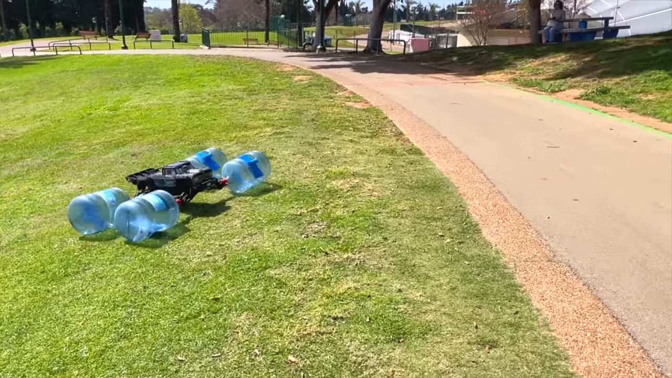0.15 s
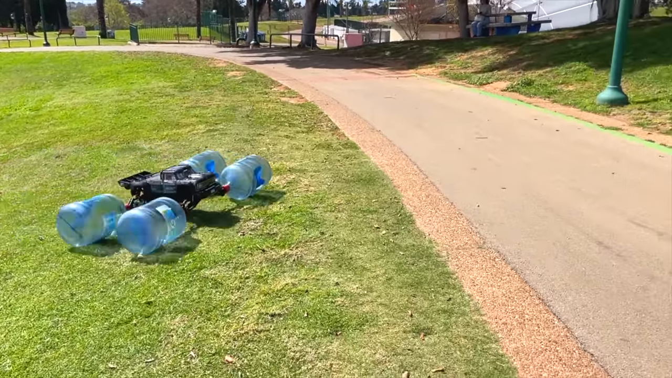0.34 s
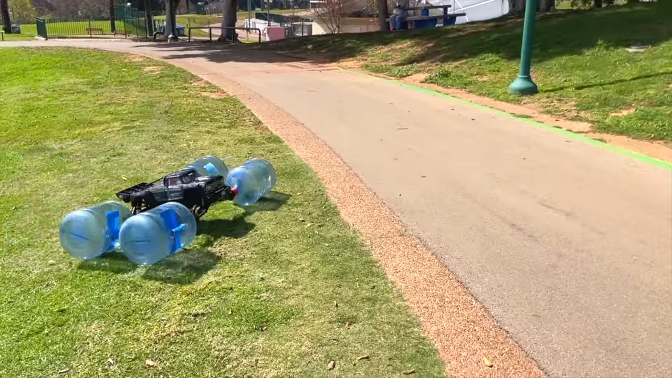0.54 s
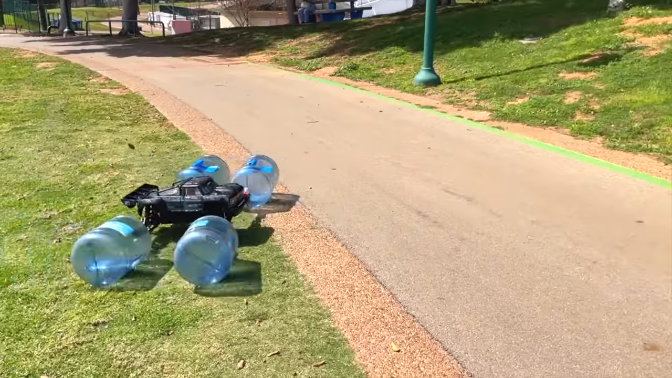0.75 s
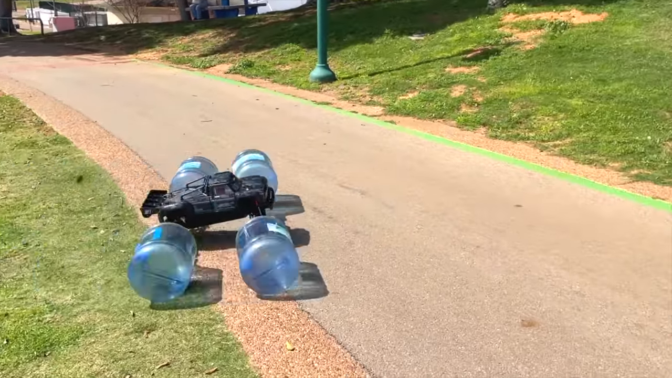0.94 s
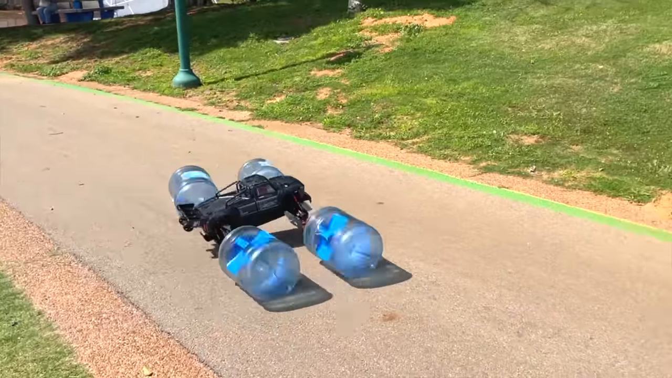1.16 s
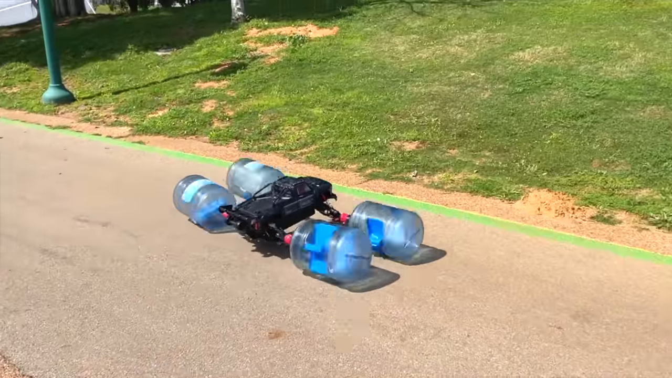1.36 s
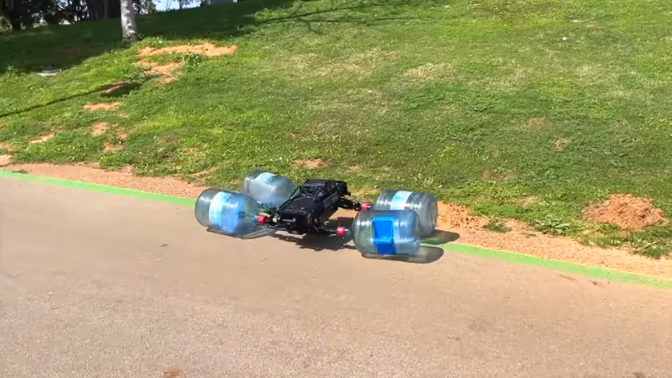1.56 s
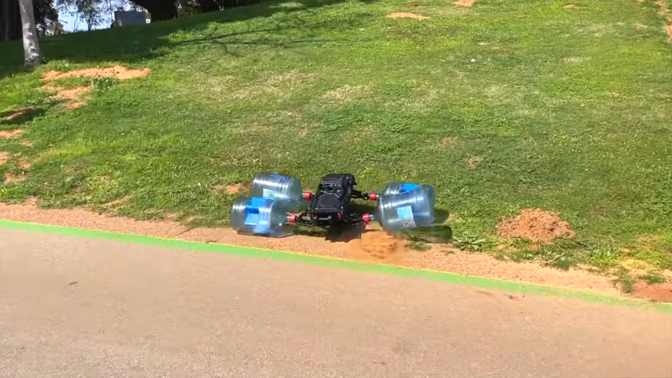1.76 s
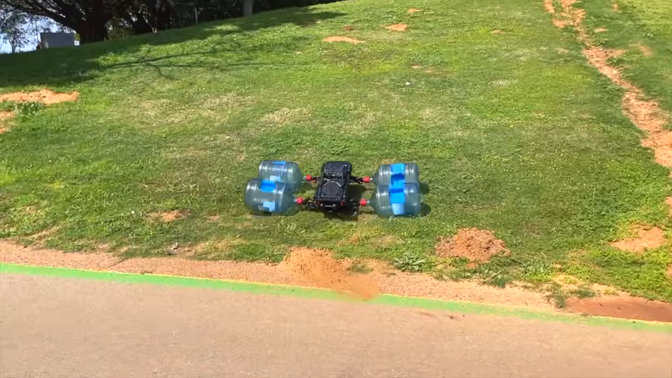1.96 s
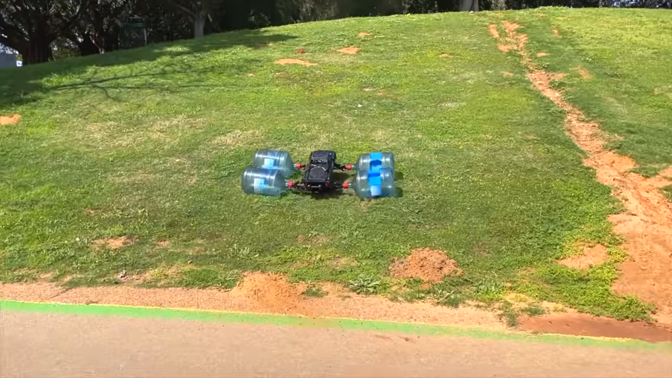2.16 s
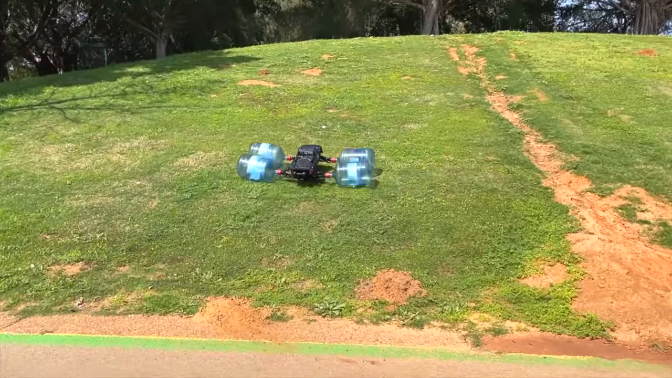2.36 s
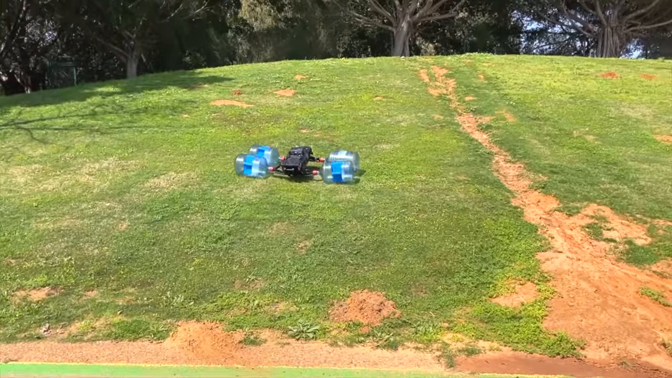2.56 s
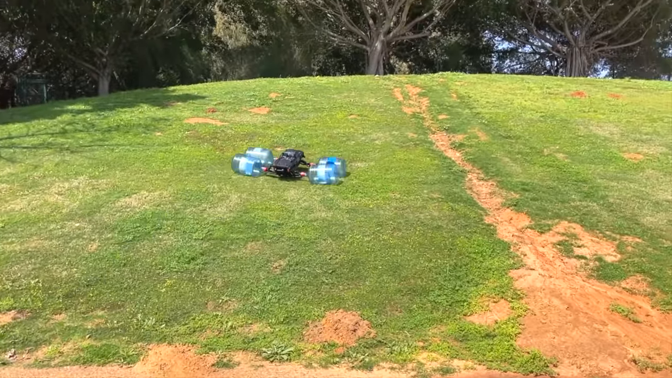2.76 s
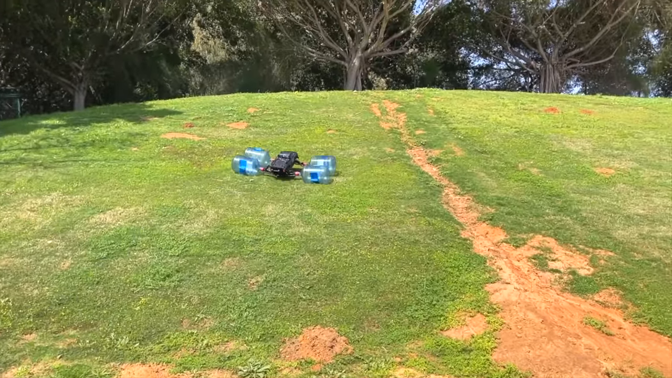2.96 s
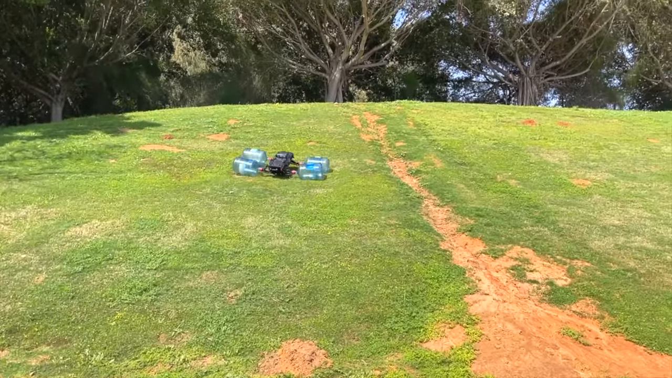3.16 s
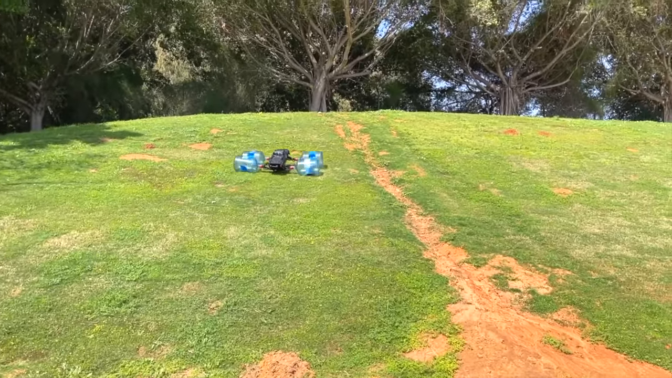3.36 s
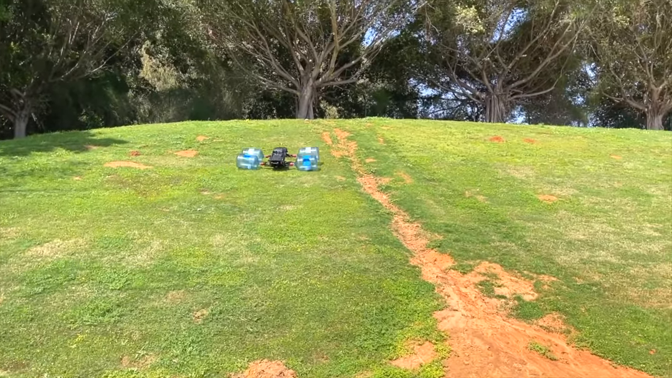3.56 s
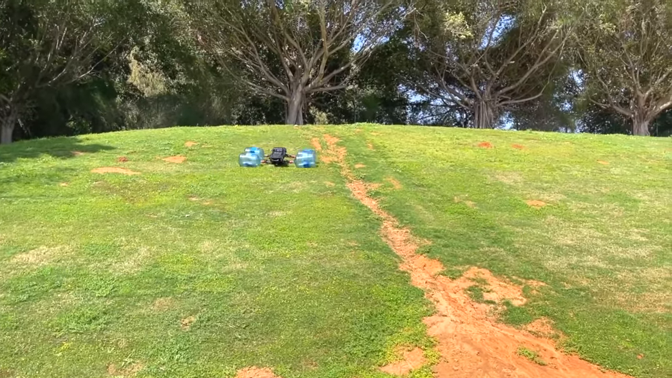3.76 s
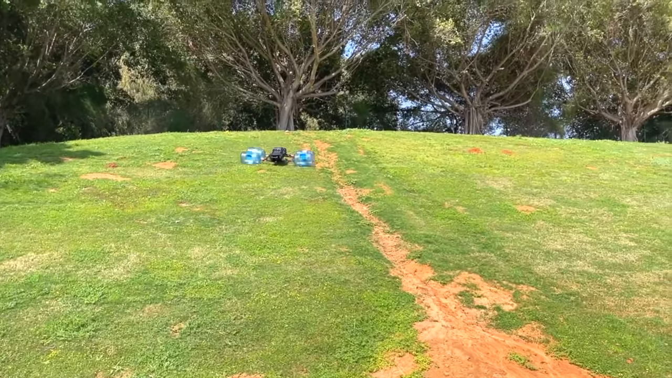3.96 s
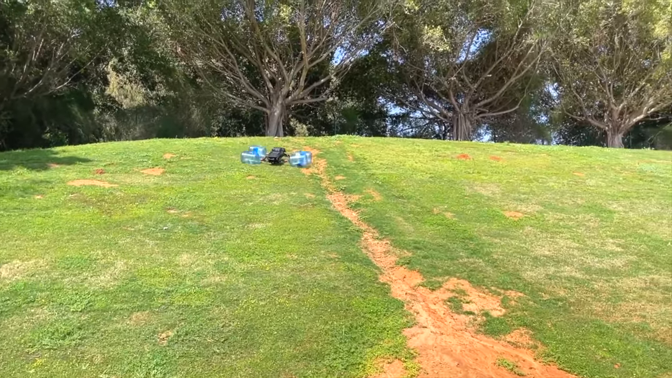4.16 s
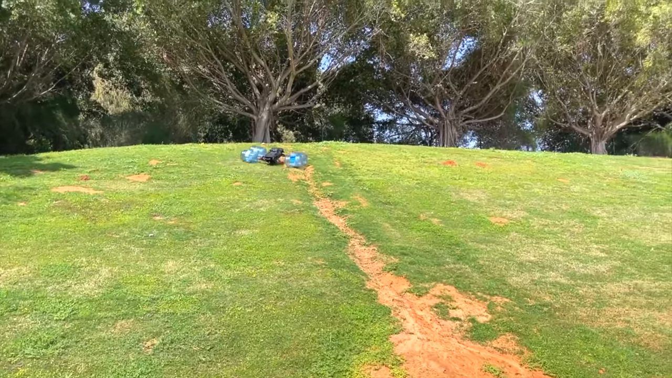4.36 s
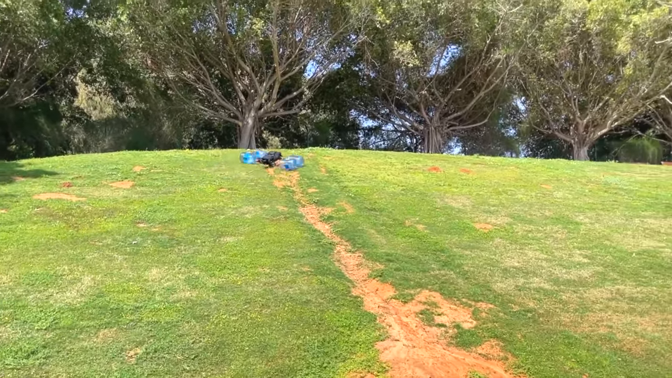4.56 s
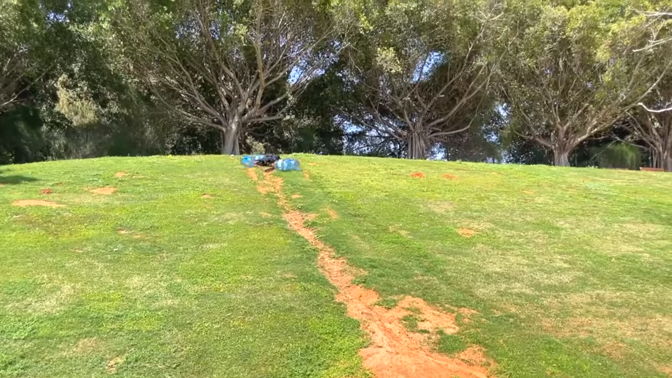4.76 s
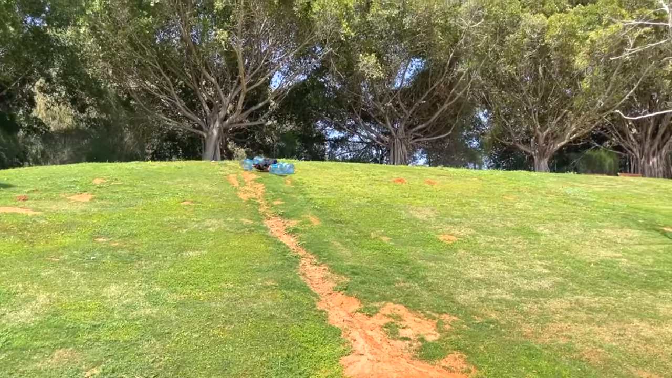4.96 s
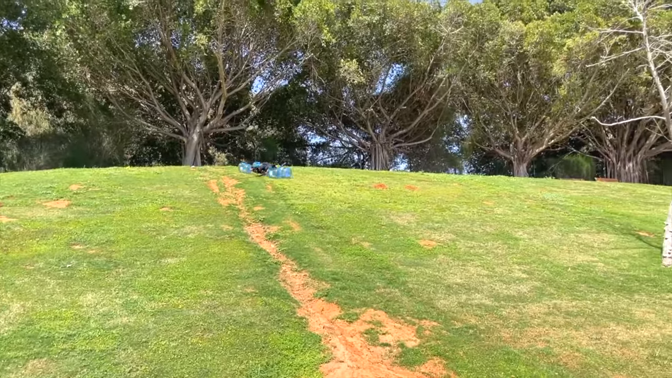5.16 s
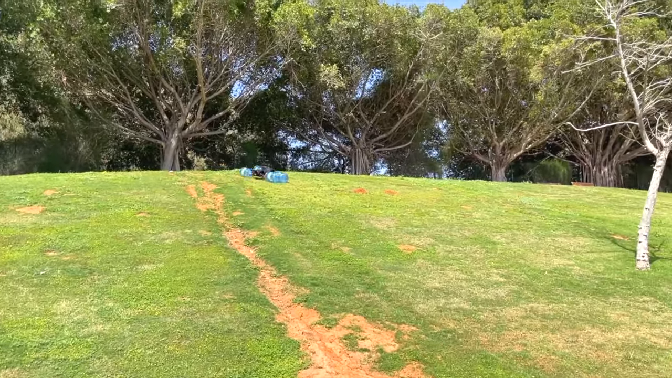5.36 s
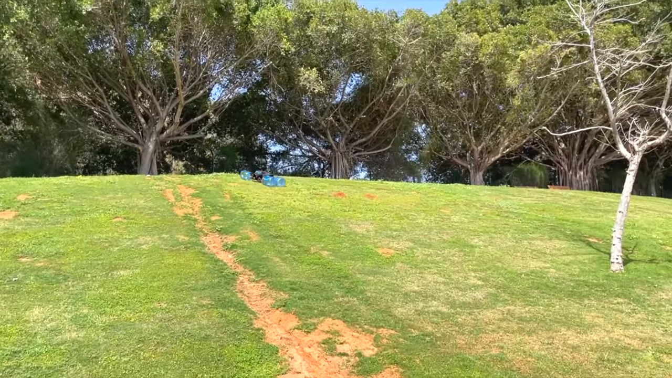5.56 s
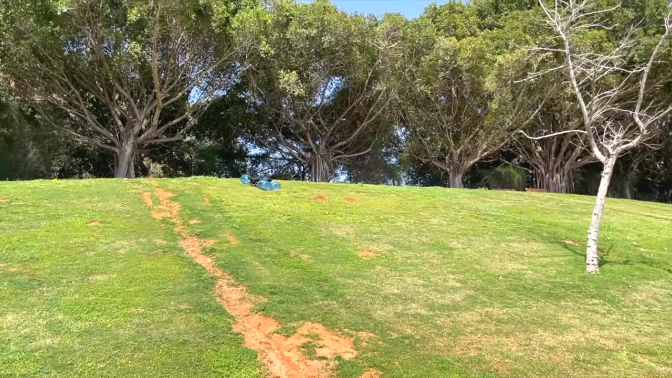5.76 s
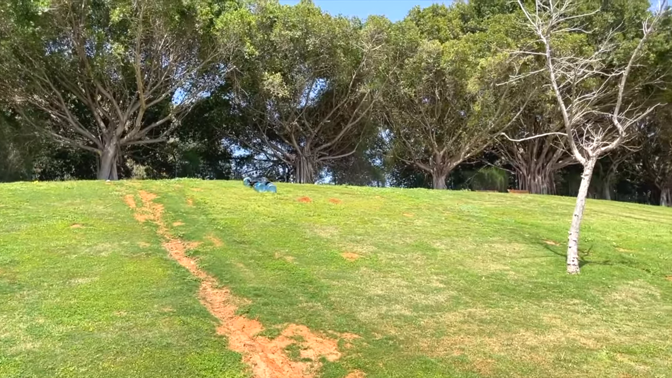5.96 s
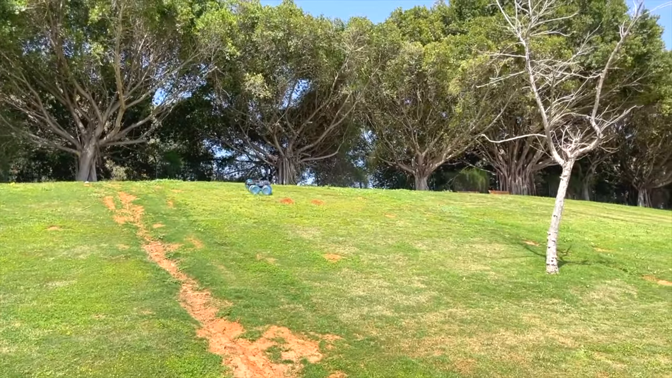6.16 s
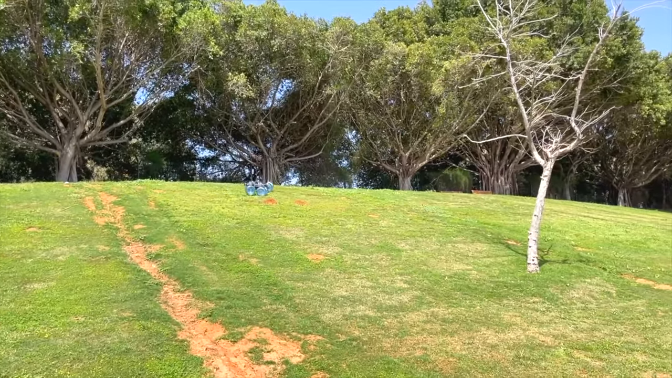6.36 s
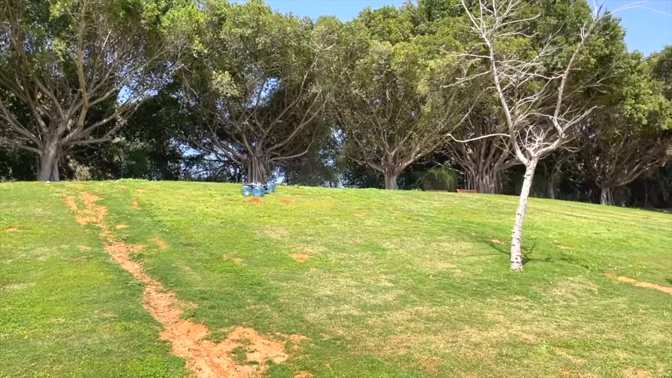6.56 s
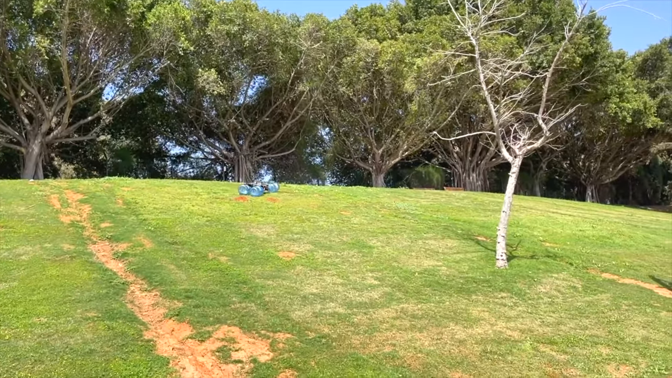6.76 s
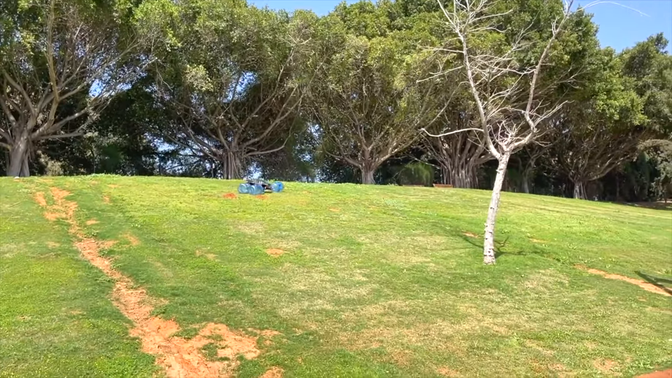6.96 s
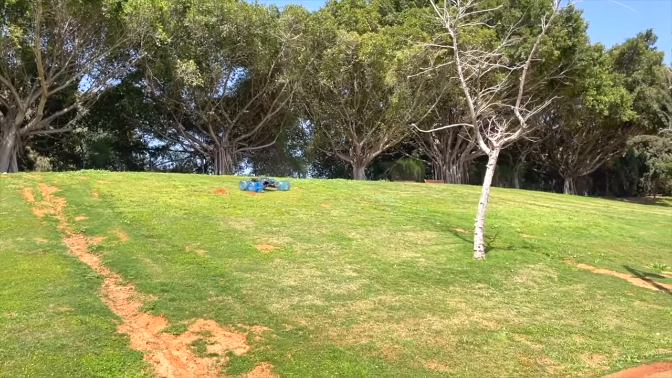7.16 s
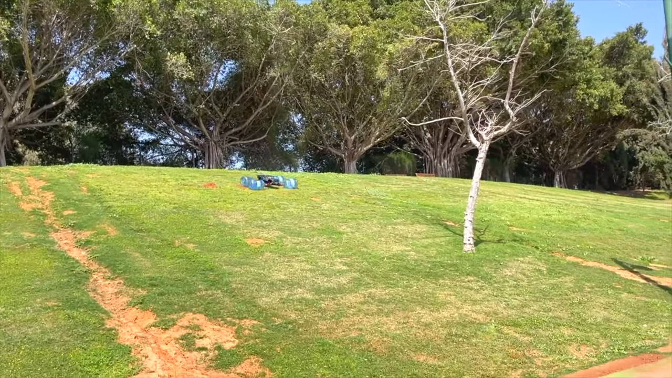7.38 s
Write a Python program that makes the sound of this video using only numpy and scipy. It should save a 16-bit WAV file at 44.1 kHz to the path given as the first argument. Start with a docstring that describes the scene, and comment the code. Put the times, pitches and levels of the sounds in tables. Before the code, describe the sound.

A handheld stereo microphone in an open park hears a whirring electric car rolling on hollow water jugs. Soft drumming and grassy scraping swell into a loud, dense clatter of slaps, knocks and resonant thuds on a paved path. The car then climbs the lawn, farther and duller, with irregular bumps and low grumbling, before sinking behind the hill. Light breeze, faint bird-like whistles and slight late gear whine remain.

```python
"""Four empty plastic water jugs, the wheels of a small electric car, drum, scrape, knock and slap: resonators and
coloured spectra struck by random grains. The car speeds over a lawn, crosses a paved path close by, climbs
a grassy hill, drops behind the crest and partly comes up again. Its gears whine (wavering sines) and rasp
(modulated noise); the park adds distant wash, far whistled notes and a light breeze on two microphone ports."""
import sys
import numpy as np
from scipy import signal
from scipy.fft import rfft, irfft
from scipy.io import wavfile

SR = 44100
rng = np.random.default_rng(int(sys.argv[2]) if len(sys.argv) > 2 else 0)


def output_pcm(signal):
    """Save a mono or channel-first signal as 16-bit PCM at the path in sys.argv[1].

    Samples are clipped to [-1, 1] before scaling.
    """
    pcm = np.clip(np.atleast_2d(signal).T, -1, 1) * 32767
    wavfile.write(sys.argv[1], SR, np.round(pcm).astype(np.int16))


N = 327222
TIME_S, FREQS_HZ = np.arange(N) / SR, np.fft.rfftfreq(N, 1 / SR)

# Levels in all tables are relative, before trims and normalisation.
# jugs rolling: t/s, drumming level/dB, scraping level/dB
ROLLING = [(0, -41.5, -39.5), (0.25, -39, -39.5), (0.45, -32, -35), (0.72, -24.5, -28.5),
           (0.92, -26, -27.5), (1.1, -24, -30), (1.68, -24.5, -30.5), (1.82, -31, -41), (2.0, -40, -47),
           (2.3, -45.5, -49.5), (2.55, -39, -48), (3.0, -45, -51), (3.7, -40.5, -52.5), (4.05, -45.5, -52),
           (4.5, -36.5, -49.5), (5.22, -37.5, -49), (5.55, -47, -48), (7.42, -46.5, -47.5)]
# reference pitch of the gears: t/s, f/Hz
GEAR_PITCH = [(0, 1000), (0.06, 1190), (0.18, 1295), (0.27, 1287), (0.37, 1430), (0.5, 1560), (0.8, 1604),
              (2.1, 1414), (2.9, 1405), (5.2, 1379), (5.6, 1235), (7.05, 1225), (7.14, 1396)]
# resonances of the jug walls: f/Hz, width/Hz, level/dB
WALL_MODES = [(345, 60, -9), (400, 49, -10.5), (507.6, 170, -4), (624, 90, 0.5), (749, 62, 1.5),
              (987.6, 55, -3), (1175, 170, -2.5)]
# high resonances of the thin plastic: f/Hz, width/Hz, level/dB
SHELL_MODES = [(1420, 250, -3), (1770, 90, -2), (2670, 65, 2), (3247, 32, -0.5), (5360, 65, 3),
               (6002, 64, 6.5), (6400, 200, 3), (7400, 70, -0.5)]
# hard landings of a jug: t/s, crack level/dB, snap level/dB, tick level/dB,
# boom lag/s, boom level/dB, boom f/Hz, wall clatter level/dB
LANDINGS = [(0.728, -4.5, -30, -41, 0.0016, -9.5, 243, -16),
            (0.7495, -7.5, -18, -19, 0.0041, -12, 208, -21.5),
            (0.9623, -4.5, -14, -29, 0.0074, -12.5, 281, -22),
            (1.118, -7.5, -13.5, -12, 0.014, -3.5, 305.4, -17),
            (1.2569, -8, -22, -15.5, 0.0089, -3, 291.3, -9.5),
            (1.397, -7.5, -14, -13, 0.014, -6.5, 268.4, -16), (1.5428, -1, -17, -11.5, 0.02, -12, 269, -23),
            (1.625, -13.5, -24, -24, 0.02, -10.5, 287.2, -41),
            (2.376, -33, -61, -65, 0.01, -18.5, 149, -50),
            (3.5674, -37.5, -46.5, -60, 0.0112, -20.5, 180, -43),
            (4.164, -33.5, -49, -30, 0.014, -15, 179, -38), (4.462, -35, -65, -65, 0.0088, -18.5, 166, -38),
            (4.557, -34, -47.5, -58, 0.0085, -27, 139, -38),
            (5.008, -25.5, -50, -38, 0.0089, -18, 162, -31)]
CRACK_HALF_S = 0.012  # the hold of a crack is down by half here, before its rise is counted


def amp(db):
    """Decibels to gain."""
    return 10 ** (np.asarray(db) / 20)


def unit(x):
    """Scales to rms 1."""
    return x / np.sqrt(np.mean(x ** 2) + 1e-20)


def curves(rows):
    """Each column of a time table, sample by sample."""
    t_s, *columns = np.transpose(rows)
    return [np.interp(TIME_S, t_s, c) for c in columns]


def spectra(rows):
    """Each column of a frequency table, bin by bin on a log axis."""
    hz, *columns = np.transpose(rows)
    return [np.interp(np.log(FREQS_HZ + 1), np.log(hz), c) for c in columns]


def colour(x, points):
    """Filters by a spectrum, keeping the power of white noise."""
    gain = unit(amp(spectra(points)[0]))
    return irfft(rfft(x) * gain, N)


def ring(x, modes):
    """Passes x through dying resonances, keeping the power of white noise."""
    t = TIME_S[:SR // 6]
    body = np.zeros(len(t))
    for k, (hz, width_hz, db) in enumerate(modes):
        decay = np.sqrt(width_hz) * np.exp(-np.pi * width_hz * t)
        body += (-1) ** k * amp(db) * decay * np.sin(2 * np.pi * hz * t)
    return signal.oaconvolve(x, body / np.linalg.norm(body))[:N]


def wander(rate_hz, step=32):
    """Random drift of rms 1, low-passed near rate_hz."""
    coarse_s = TIME_S[::step]
    hz = np.fft.rfftfreq(len(coarse_s), step / SR)
    noise = rfft(rng.standard_normal(len(coarse_s)))
    slow = irfft(noise / (1 + (hz / rate_hz) ** 4), len(coarse_s))
    return unit(np.interp(TIME_S, coarse_s, slow))


def grains(per_s, spread_db):
    """Random tiny impacts of uneven size, rms 1."""
    size = amp(spread_db * np.minimum(rng.exponential(1, N), 4))
    sign = rng.choice([-1, 1], N)
    return unit(size * sign * (rng.random(N) < per_s / SR))


def add(mix, t_s, sound):
    """Mixes a sound in at t_s, or at 0 if that is negative."""
    part = mix[max(round(t_s * SR), 0):][:len(sound)]
    part += sound[:len(part)]


def burst(t, half_s, rise_s):
    """Quick rise, a short hold, then a fall around half_s."""
    return (1 - np.exp(-t / rise_s)) / (1 + (t / half_s) ** 3)


def window(start_s, rise_s, end_s, fall_s):
    """Rises from 0 to 1, holds, and falls back from end_s."""
    return np.clip((TIME_S - start_s) / rise_s, 0, 1) * np.clip(1 - (TIME_S - end_s) / fall_s, 0, 1)


def glides(rows, waver_hz):
    """Notes that swell and fade while their pitch slides, off course by waver_hz."""
    out = np.zeros(N)
    for t_s, length_s, first_hz, last_hz, db in rows:
        u = np.linspace(0, 1, round(length_s * SR))
        hz = first_hz + (last_hz - first_hz) * u + np.interp(t_s + u * length_s, TIME_S, waver_hz)
        tone = unit(np.sin(2 * np.pi * np.cumsum(hz) / SR))
        add(out, t_s, amp(db) * np.sin(np.pi * u) * tone)
    return out


def hardness():
    """Hardness of the ground under the jugs: lawn 0, pavement 0.84."""
    # paved path: first jug on t/s, time to get on/s, first jug off t/s, time to get off/s
    path = (0.5, 0.67, 1.67, 0.53)
    return 0.84 * window(*path)


def hidden():
    """How far the car has sunk behind the crest, 0-1."""
    # crest: sinks t/s, time to sink/s, comes up t/s, time to come up/s
    crest = (5.224, 0.48, 5.94, 2.94)
    return window(*crest)


def scraping_db():
    """Scraping level, lowered by the hill's shadow."""
    return curves(ROLLING)[1] - 20 * hidden()


def load():
    """Throttle pushes load the gears: gains of the rasp and of the whining overtones."""
    # throttle: start t/s, length/s, rasp level/dB, overtone level/dB
    pushes = [(-0.1, 0.27, -47.5, -47), (0.13, 0.45, -58, -37.5), (0.587, 1.23, -42, -43.5),
              (1.887, 0.68, -60, -56.5), (2.541, 0.37, -56.5, -59), (2.999, 1.34, -59.5, -65),
              (5.056, 0.15, -49.5, -66), (5.25, 0.11, -51, -68), (7.048, 0.35, -65, -80.5)]
    rise_s, fall_s = 0.065, 0.058
    return sum(amp(db)[:, None] * window(t_s, rise_s, t_s + length_s, fall_s)
               for t_s, length_s, *db in pushes)


def park(air_db=-53, calm_db=-50, wind_db=3.0, buffet_db=3.0, apart=0.31):
    """Coloured noise makes distant wash and gusts on the ports; gliding sines whistle far off."""
    # distant wash: f/Hz, level/dB
    air_spectrum = [(30, -9.5), (100, -11.5), (200, -14), (400, -20), (800, -20.5), (1150, -21.5),
                    (1900, -27), (3000, -34), (4300, -43.5), (7000, -43), (12500, -72.5), (14300, -56.5),
                    (15200, -81.5)]
    # breeze: f/Hz, level/dB
    wind_spectrum = [(20, -36), (40, -11.5), (65, -4.5), (90, -8), (130, -11), (220, -34), (500, -78)]
    # gusts: peak t/s, gaussian width/s, level/dB
    breeze = [(0.0, 0.026, -37), (0.77, 0.29, -34), (1.42, 0.031, -41), (1.7, 0.27, -45),
              (2.48, 0.073, -38), (2.9, 0.34, -46.5), (5.499, 0.18, -55), (6.419, 0.16, -43.5),
              (7.11, 0.06, -41), (7.4, 0.12, -43.5)]
    # whistled notes: start t/s, length/s, first f/Hz, last f/Hz, level/dB
    whistles = [(5.64, 0.1, 3210, 3160, -72), (5.76, 0.08, 3160, 3130, -72),
                (5.84, 0.08, 3170, 3170, -69.5), (6.4, 0.22, 3090, 3060, -71),
                (6.58, 0.21, 3060, 2865, -73)]
    air = colour(rng.standard_normal((2, N)) + 0.14 * rng.standard_normal(N), air_spectrum)
    wind = colour(rng.standard_normal(N) + apart * rng.standard_normal((2, N)), wind_spectrum)
    gust_power = sum((amp(db) * np.exp(-.5 * ((TIME_S - t_s) / width_s) ** 2)) ** 2
                     for t_s, width_s, db in breeze)
    strength = np.sqrt(amp(calm_db) ** 2 + gust_power)
    wind = unit(wind) * strength * amp(wind_db + buffet_db * np.tanh(wander(20)))
    return amp(air_db) * unit(air) + wind + glides(whistles, 18 * wander(70))


def revs(blur_hz=450):
    """The revving motor's high whine sweeps up, pitch and level smeared almost into hiss."""
    # sweeps: start t/s, length/s, first f/Hz, last f/Hz, level/dB
    sweeps = [(0.5, 0.34, 11100, 14800, -37.5), (1.98, 0.41, 10700, 14340, -64)]
    return glides(sweeps, blur_hz * wander(420)) * wander(305.6)


def rasp(rasp_db=-1, judder_db=0.5, core_hz=260, skirt_hz=750, skirt=0.69, waver=0.064):
    """Loaded gears chatter: an uneven band around twice the reference pitch, with wide skirts."""
    pitch_hz = 2 * curves(GEAR_PITCH)[0] * (1 + waver * wander(14))
    angle = 2 * np.pi * np.cumsum(pitch_hz) / SR

    def baseband(lowpass):
        return unit(irfft(rfft(grains(2600, 1.4) * np.cos(angle)) * lowpass, N))

    core = baseband(1 / np.sqrt(1 + (FREQS_HZ / core_hz) ** 4))
    wide = baseband(1 / np.sqrt(1 + (FREQS_HZ / skirt_hz) ** 6))
    chatter = core * np.cos(angle) + skirt * wide * np.sin(angle)
    return unit(chatter) * load()[0] * amp(rasp_db + judder_db * np.tanh(wander(27)))


def gears(waver=0.014, tone_rough=0.027, overtone_rough=0.021, flutter_db=3, chatter=0.59,
          tone_db=-16, coast_db=-65, overtone_db=-1):
    """Meshing teeth whine: one tone with the scraping and coasting, more strands under load; all shake."""
    # loaded whines: multiple of the reference pitch, level/dB
    strands = [(0.8, -8), (1.72, -11), (2, -1), (2.6, -27.5), (3, -9), (4, -20), (6, -20), (8, -8.5)]
    # coasting, gears unloaded: start t/s, rise/s, end t/s, fall/s
    coast = (6.1, 0.35, 6.9, 0.16)
    pitch_hz = curves(GEAR_PITCH)[0]

    def strand(multiple, rough):
        hz = multiple * pitch_hz * (1 + waver * wander(16) + rough * wander(311))
        flutter = amp(flutter_db * np.tanh(wander(25)))
        return unit(np.sin(2 * np.pi * np.cumsum(hz) / SR) * flutter * (1 + chatter * wander(90)))

    overtones = unit(sum(amp(db) * strand(multiple, overtone_rough) for multiple, db in strands))
    tone_gain = amp(scraping_db() + tone_db) + amp(coast_db) * window(*coast)
    return tone_gain * strand(0.9, tone_rough) + amp(overtone_db) * load()[1] * overtones


def shell(x, ringing=0.054):
    """A sharp blow is heard directly and through the short ring of the thin plastic."""
    return x + ringing * ring(x, SHELL_MODES)


def hollow(x, ringing):
    """What shakes a jug is heard directly and through the lasting ring of the air inside."""
    # air resonances: f/Hz, width/Hz, level/dB
    cavity_modes = [(649, 27, -5), (779, 22, -3), (800, 8.8, -2), (1114, 16, -0.5), (1430, 40, -8.5),
                    (1817, 24, 5), (2180, 50, -9.5), (2690, 60, -9)]
    return x + ringing * ring(x, cavity_modes)


def verge(db=-51, clump_db=3):
    """Dry stalks and dirt beside the path snap in clumps as the jugs leave it."""
    # verge: start t/s, rise/s, end t/s, fall/s
    verge_window = (1.6, 0.098, 1.72, 1.05)
    # stalks: f/Hz, level/dB
    stalk_spectrum = [(1300, 0), (1750, 18), (2500, -24), (3400, 1), (3900, 19), (4700, -15), (6500, -33),
                      (9000, -30.5)]
    snaps = colour(grains(500, 3.2), stalk_spectrum)
    return amp(db + clump_db * wander(30)) * window(*verge_window) * snaps


def scuffs(db=-46, lurch_db=2.5):
    """Rough ground high on the hill keeps the jug walls grumbling: dense low-coloured grains."""
    # rough ground: start t/s, rise/s, end t/s, fall/s
    rough_ground = (2.92, 1.72, 5.3, 0.06)
    # scuffed walls: f/Hz, level/dB
    scuff_spectrum = [(190, -8), (285, -0.5), (400, -11), (520, -4.5), (630, 6), (820, -12), (1030, -1.5),
                      (1300, -27), (2500, -42.5)]
    grumble = colour(grains(1400, 1.0), scuff_spectrum)
    return amp(db + lurch_db * wander(15)) * window(*rough_ground) * grumble


def ticks(tick_db=0.0, half_s=0.0051):
    """A crease flips in the thin wall: almost all of it is high treble."""
    # flips: f/Hz, level/dB
    tick_spectrum = [(5000, -22.5), (9000, -4.5), (12000, -3.5), (14500, -1), (16000, -23.5)]
    t, flips = TIME_S[:SR // 16], np.zeros(N)
    for t_s, _, _, db, *_ in LANDINGS:
        add(flips, t_s, amp(db + tick_db) * burst(t, half_s, 0.0024))
    return colour(flips * grains(13000, 1.0), tick_spectrum)


def knocks(knock_db=0.0, detune=0.015, reach_octaves=0.45, decay_s=0.008):
    """A stone or clod sets the wall's modes ringing together; each spot is tuned a little differently."""
    # knocks: t/s, level/dB, strongest f/Hz
    blows = [(0.73, -8.5, 760), (1.259, -10, 1010), (1.415, -7, 690), (1.548, -13, 1100), (1.705, -20, 696),
             (1.815, -16.5, 650), (2.38, -36, 950), (2.487, -33, 380), (2.642, -30.5, 380),
             (3.486, -37, 647), (3.864, -31.5, 1060), (3.92, -25.5, 654), (4.042, -36, 600),
             (4.434, -26, 517), (4.474, -28, 650), (4.555, -32, 850), (4.58, -30.5, 910), (4.694, -34, 860),
             (4.78, -28, 615), (4.81, -28, 568), (5.009, -29.5, 1000), (5.021, -22, 298),
             (5.036, -27.5, 450)]
    t, out = TIME_S[:SR // 12], np.zeros(N)
    hz, _, db = np.transpose(WALL_MODES + SHELL_MODES)[:, :, None]
    for t_s, level_db, strongest_hz in blows:
        weight = amp(db) * np.exp(-.5 * (np.log2(hz / strongest_hz) / reach_octaves) ** 2)
        tuning, side = rng.uniform(-1, 1, (2, len(hz), 1))
        modes = np.sign(side) * weight * np.sin(2 * np.pi * hz * (1 + detune * tuning) * t)
        knock = np.exp(-t / decay_s) * modes.sum(0) / np.linalg.norm(weight)
        add(out, t_s, amp(level_db + knock_db) * knock)
    return out


def small_creases(per_s=12, lawn_db=-9, crack_db=1.5, snap_db=-10.5, spread_db=6.5):
    """Walls flex at random, harder on pavement: rows of t/s, crack level/dB, snap level/dB, half time/s."""
    count = int(per_s * N / SR)
    place, size = rng.random((count, 2)).T
    at = ((np.arange(count) + place) / count * (N - 1)).astype(int)
    ground_db = (scraping_db() + lawn_db * (1 - hardness()))[at]
    level_db = ground_db + spread_db * (2 * size - 1)
    return [(t_s, db + crack_db, db + snap_db, CRACK_HALF_S) for t_s, db in zip(TIME_S[at], level_db)]


def slaps(crack_db=-8, snap_db=1):
    """A buckling wall gives milliseconds of dense crackle; the bright snap rises before the duller crack."""
    # buckling without a bounce: t/s, crack level/dB, snap level/dB, half time/s
    creases = [(0.558, -17.5, -38, 0.023), (0.835, -10.5, -19.5, 0.013), (0.85, -19, -32, 0.023),
               (1.015, -16.5, -27, 0.01), (1.037, -15, -18.5, 0.0089), (1.06, -17.5, -20.5, 0.011),
               (1.101, -12.5, -20, 0.0051), (1.179, -13.5, -21.5, 0.0092), (1.246, -14.5, -23.5, 0.012),
               (1.273, -8.5, -32, 0.0052), (1.314, -26.5, -26, 0.017), (1.342, -35.5, -22.5, 0.0066),
               (1.447, -18.5, -25, 0.023), (1.521, -20, -24, 0.0095), (1.598, -22.5, -25, 0.02),
               (1.681, -22, -28, 0.027), (1.762, -36, -30.5, 0.01), (1.791, -17.5, -35.5, 0.022),
               (1.912, -29, -54, 0.012), (1.963, -34.5, -59, 0.041), (2.065, -33, -54, 0.021),
               (3.533, -32, -49, 0.007), (3.861, -37.5, -57, 0.041), (3.894, -24.5, -54, 0.015),
               (3.919, -36, -55, 0.017), (4.69, -33, -52, 0.01), (7.077, -45.5, -63, 0.076),
               (7.227, -44.5, -58, 0.019), (7.283, -40.5, -68, 0.012)]
    # crack: f/Hz, level/dB
    crack_spectrum = [(300, -14.5), (750, 4.5), (1200, -1), (1460, 7.5), (1680, 3), (1850, 2.5), (2200, 0),
                      (2700, 6), (3400, 2), (4500, -20.5), (9000, -34)]
    # snap: f/Hz, level/dB
    snap_spectrum = [(2000, -66), (4000, 5.5), (5400, 1), (7000, 2.5), (9500, -1), (11500, -13),
                     (14000, -11), (16000, -25)]
    t, crack, snap = TIME_S[:SR // 8], np.zeros(N), np.zeros(N)
    landings = [(t_s, low_db, high_db, CRACK_HALF_S) for t_s, low_db, high_db, *_ in LANDINGS]
    for t_s, low_db, high_db, half_s in landings + creases + small_creases():
        add(crack, t_s, amp(low_db + crack_db) * burst(t, half_s, 0.0023))
        add(snap, t_s, amp(high_db + snap_db) * burst(t, half_s, 0.00069))
    dull = colour(crack * grains(6000, 0.75), crack_spectrum)
    bright = colour(snap * grains(3700, 1.0), snap_spectrum)
    return shell(dull + bright)


def booms(boom_db=-3, clatter_db=0, thud_db=-17, soft_half_s=0.019, hard_half_s=0.042,
          clatter_share=0.69, clatter_rise_s=0.006):
    """A bouncing jug's wall modes clatter; it thuds and booms at its lowest mode, after a lag if it landed hard."""
    # bounces without a crack: t/s, boom level/dB, boom f/Hz, wall clatter level/dB
    bumps = [(0.422, -9, 150, -25), (0.684, -7, 206, -56), (0.709, -5.5, 261, -36), (0.8, -10.5, 164, -40),
             (0.895, -18, 190, -20), (1.019, -19, 269, -22), (1.35, -13, 309, -36),
             (1.429, -12.5, 278, -48), (1.465, -11, 249, -23), (1.714, -14.5, 245, -28),
             (1.775, -13.5, 154, -34), (1.895, -22.5, 150, -39), (2.069, -27.5, 150.5, -57),
             (2.264, -19, 143.7, -67), (2.443, -13.5, 156.2, -59), (2.471, -11.5, 158, -44),
             (2.548, -17, 152, -55), (2.639, -31, 194, -55), (3.009, -19.5, 152, -47),
             (3.128, -26, 157.5, -43), (3.481, -30, 170, -55), (3.655, -22.5, 169, -43),
             (3.723, -22, 239, -42), (3.775, -18.5, 156, -43), (3.916, -44, 144, -35),
             (4.04, -29, 205, -57), (4.409, -14.5, 237, -41), (4.431, -22, 235, -45),
             (4.576, -20, 140, -34), (4.779, -32, 180, -37), (4.805, -23.5, 188, -42),
             (4.862, -15.5, 159, -36), (5.033, -27, 199, -28), (5.188, -36, 162, -45),
             (5.272, -40, 162.7, -42), (6.549, -36.5, 147, -48)]
    # dented jug's thud: f/Hz, level/dB
    thud_spectrum = [(130, -18.5), (210, 1), (270, 7.5), (400, -12.5), (560, -4.5), (900, -32), (2000, -36)]
    t, tone, dent, push = TIME_S[:SR // 4], np.zeros(N), np.zeros(N), np.zeros(N)
    hard = hardness()
    landings = [(t_s, *rest) for t_s, _, _, _, *rest in LANDINGS]
    for t_s, lag_s, db, hz, wall_db in landings + [(t_s, 0, *rest) for t_s, *rest in bumps]:
        half_s = soft_half_s + (hard_half_s - soft_half_s) * np.interp(t_s, TIME_S, hard)
        blow = amp(db) * burst(t, half_s, 0.0059)
        add(tone, t_s + lag_s, blow * np.sin(2 * np.pi * hz * t))
        add(dent, t_s + lag_s, blow)
        add(push, t_s, amp(wall_db + clatter_db) * burst(t, clatter_share * half_s, clatter_rise_s))
    clatter = ring(push * grains(1600, 0.73), WALL_MODES)
    clatter = signal.sosfilt(signal.butter(2, 1800, fs=SR, output="sos"), clatter)
    thud = colour(dent * grains(3300, 0.74), thud_spectrum)
    body = amp(boom_db) * tone + amp(thud_db) * thud
    # the booms keep no deep rumble below about 95 Hz
    return signal.sosfilt(signal.butter(3, 95, "high", fs=SR, output="sos"), body) + clatter


def rolling(drum_db=4.5, turf_db=2, pavement_db=2, rattle_db=-3, hiss_db=-3.0, lurch_db=1.05,
            hard_lurch_db=1.5, bare_hiss_db=-10, hiss_db_per_octave=6, drum_lurch_db=2):
    """Bumps drum the hollow jugs; grit and grass blades scrape along their walls."""
    # jug resonances on lawn: f/Hz, width/Hz, level/dB
    soft_modes = [(140.8, 30, -4), (215, 128, -2), (252.9, 43, -6)]
    # jug resonances on pavement: f/Hz, width/Hz, level/dB
    hard_modes = [(143.6, 27, -12), (239.4, 14, 0), (299, 20, 4.5)]
    # grass blades: f/Hz, level/dB
    turf_spectrum = [(150, -18.5), (330, 1), (470, 2.5), (680, 2), (900, -5), (1250, -6.5), (1900, -9),
                     (2850, -5.5), (3800, -9.5), (5300, -16), (7500, -33), (10000, -27), (12000, -23.5),
                     (14700, -25), (15500, -41.5)]
    # grit: f/Hz, level/dB
    grit_spectrum = [(150, -33.5), (380, 3.5), (560, 8.5), (700, 10.5), (790, 11.5), (920, -9), (1170, 3.5),
                     (1600, -2.5), (1850, 0.5), (2200, -5.5), (2800, -11), (4300, -7), (6500, -12),
                     (9000, -27), (12000, -18.5)]
    # blade hiss: f/Hz, level/dB
    hiss_spectrum = [(3000, -32), (7000, -0.5), (9500, 5), (12500, -4.5), (14000, 7.5), (14800, 1.5),
                     (15400, -17.5)]
    scrape, hard, shadow = scraping_db(), hardness(), hidden()
    drum = curves(ROLLING)[0] - 12.5 * shadow
    speed = curves(GEAR_PITCH)[0]
    # more hiss at speed, less on pavement and behind the hill
    hiss = scrape + hiss_db_per_octave * np.log2(speed / speed.mean()) + bare_hiss_db * hard - 13 * shadow
    on_hard, on_soft = np.sqrt(hard), np.sqrt(1 - hard)
    lurch = (lurch_db + hard_lurch_db * hard) * wander(21)  # jugs press and lift unevenly
    bumps = grains(900, 1.9)
    body = on_soft * ring(bumps, soft_modes) + on_hard * ring(bumps, hard_modes)
    body = signal.sosfilt(signal.butter(2, [100, 480], "band", fs=SR, output="sos"), body)
    blades = amp(turf_db) * on_soft * colour(grains(5000, 2.2), turf_spectrum)
    gritty = np.sqrt(hard + 0.036)  # the lawn has a little gritty bare soil
    grit = amp(pavement_db) * gritty * unit(shell(colour(grains(2200, 3.2), grit_spectrum)))
    rattle = amp(rattle_db) * ring(grains(140, 0.41), WALL_MODES)  # single knocks on the thin walls
    swish = amp(hiss + hiss_db + .5 * lurch) * colour(grains(29000, 1.1), hiss_spectrum)
    drumming = amp(drum + drum_db + drum_lurch_db * wander(18)) * body
    return drumming + amp(scrape + lurch) * (blades + grit + rattle) + swish


def ground_echo(x, lawn_strength=0.23):
    """The bounce off the ground combs the sound at a moving delay, less over pavement."""
    # extra path of the echo: t/s, delay/ms
    echo = [(0, 1.68), (1.7, 1.86), (2.3, 0.91), (3.6, 1.51), (4.3, 1.826), (7.42, 1.87)]
    delay_s = curves(echo)[0] / 1000
    strength = lawn_strength * (1 - hardness())
    soft = signal.sosfilt(signal.butter(1, 5000, fs=SR, output="sos"), x)  # turf swallows the treble
    bounce = np.interp(TIME_S - delay_s, TIME_S, soft)
    return (x + strength * bounce) / np.sqrt(1 + strength ** 2)


def ports(x, size=128):
    """Two ports hear the car with phase and level offsets, plus diffuse scatter that differs between them."""
    # port pair: f/Hz, left lead/rad, likeness 0-1, left minus right level/dB
    port_pair = [(60, 0, .99, -1.2), (130, .08, .995, -2.2), (280, .26, .99, -2.7), (850, .7, .93, 1.2),
                 (1450, .5, .84, 4), (1900, -.2, .88, 1), (2900, 1.3, .88, -3.6), (3800, 2.4, .62, -1.8),
                 (5000, 4.9, .5, 3), (6000, 5.3, .7, 1), (7000, 5.4, .7, 5), (7700, 3.4, .88, 3.5),
                 (8500, 3.15, .95, 0), (9400, 3, .94, 0), (10200, 2.6, .85, 0), (10900, .1, .98, 0),
                 (12000, 0, .99, 0)]
    lead_rad, like, balance_db = spectra(port_pair)
    sound, noise = signal.stft([x, rng.standard_normal(N)], nperseg=size)[2]
    scatter = signal.istft(abs(sound) * noise / noise.std(), nperseg=size)[1][:N]
    shared = np.sqrt((1 + like) / 2) * rfft(x)
    apart = np.sqrt((1 - like) / 2) * rfft(scatter)
    tilt = amp(balance_db / 2) * np.exp(.5j * lead_rad)
    return irfft(np.array([(shared + apart) * tilt, (shared - apart) / tilt]), N)


def scene():
    """The car with its ground echo, in the open park."""
    rubbing = hollow(rolling() + scuffs(), ringing=0.013)
    blows = hollow(slaps() + booms() + knocks(), ringing=0.082)
    jugs = rubbing + blows + ticks() + verge()
    return ports(ground_echo(jugs + gears() + rasp() + revs())) + park()


def record(dry):
    """A bass cut, soft overload of the loudest peaks, then the band limit."""
    lean = signal.sosfilt(signal.butter(2, 32, "high", fs=SR, output="sos"), dry)
    limited = lean / (1 + (lean / .95) ** 6) ** (1 / 6)
    lowpass = signal.firwin(511, 15900, window=("kaiser", 9), fs=SR)
    return signal.oaconvolve(limited, lowpass[None], "same")


dry = scene()
out = record(dry)
output_pcm(out)
```